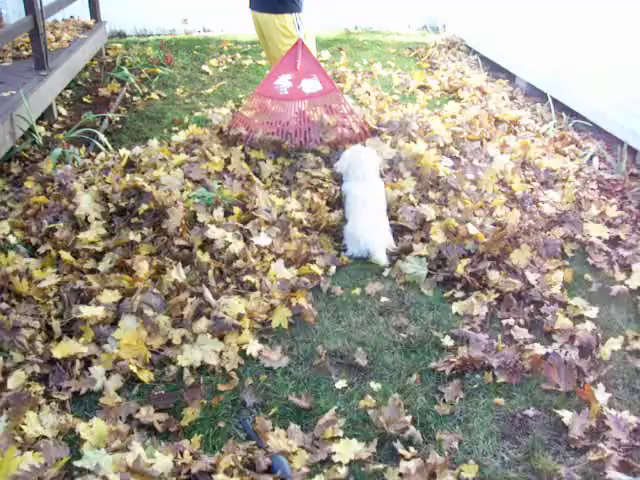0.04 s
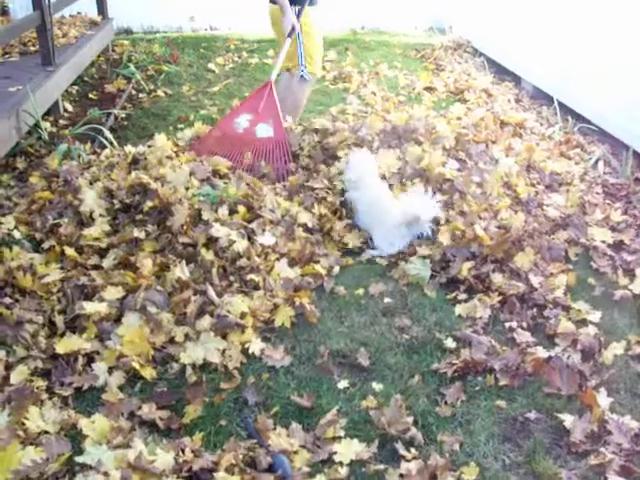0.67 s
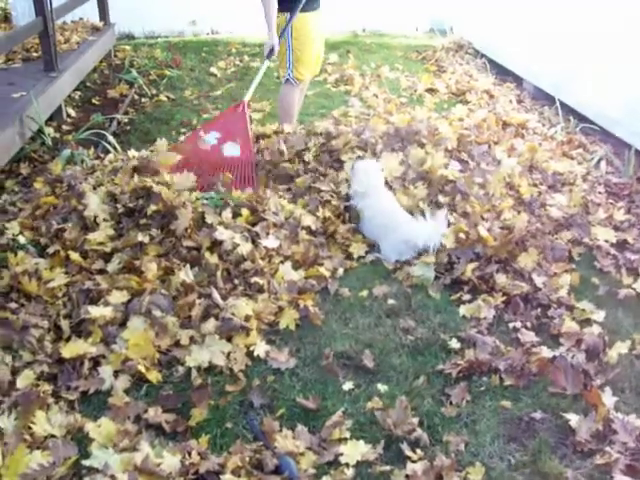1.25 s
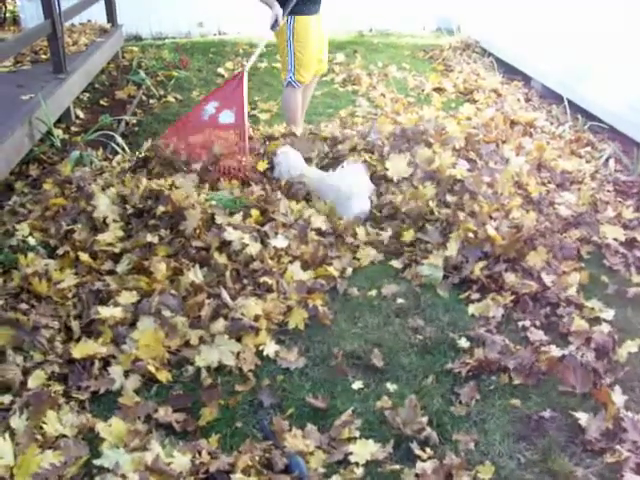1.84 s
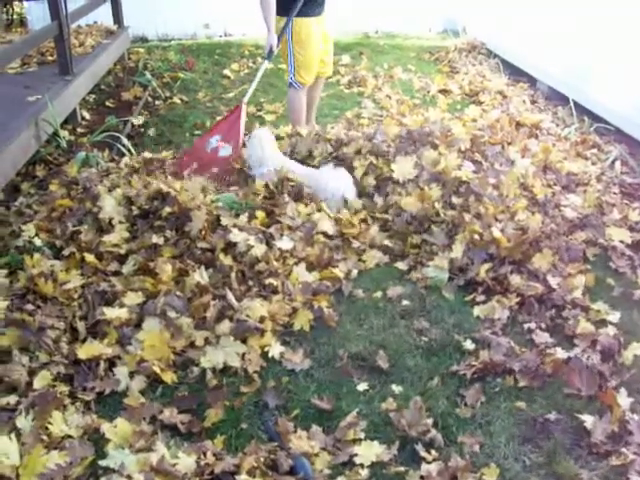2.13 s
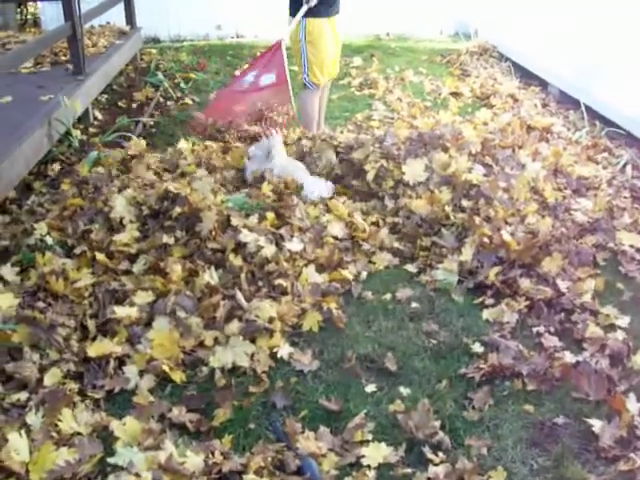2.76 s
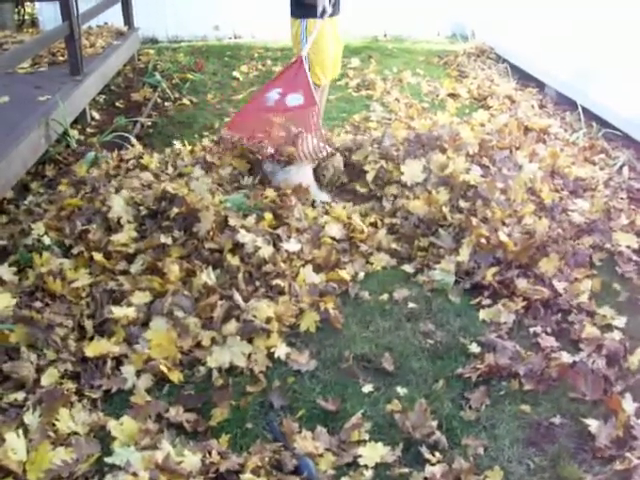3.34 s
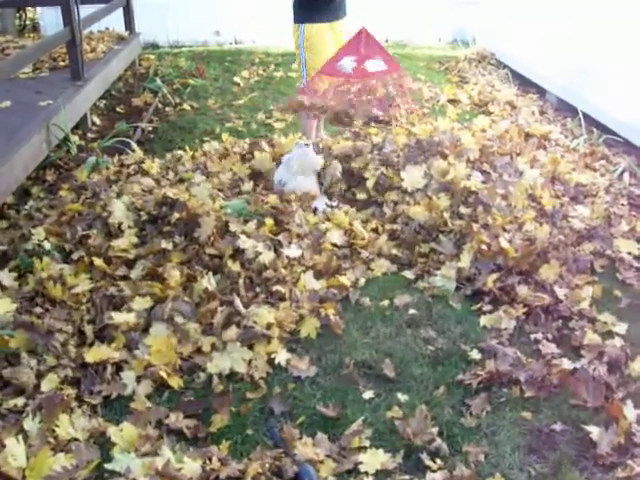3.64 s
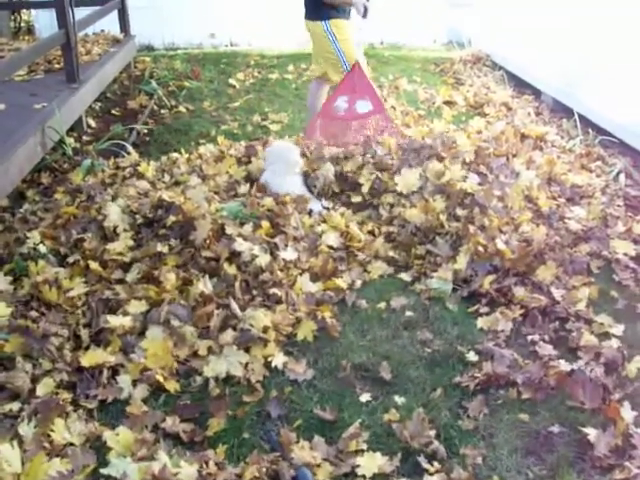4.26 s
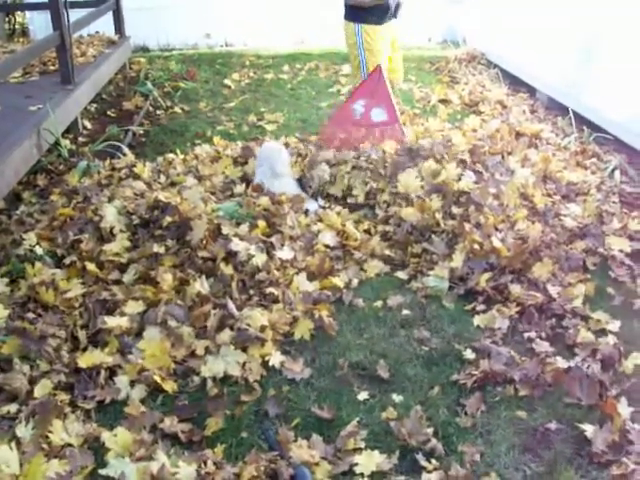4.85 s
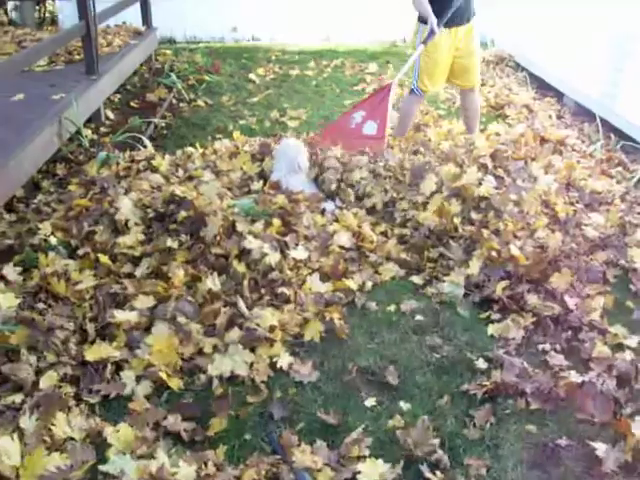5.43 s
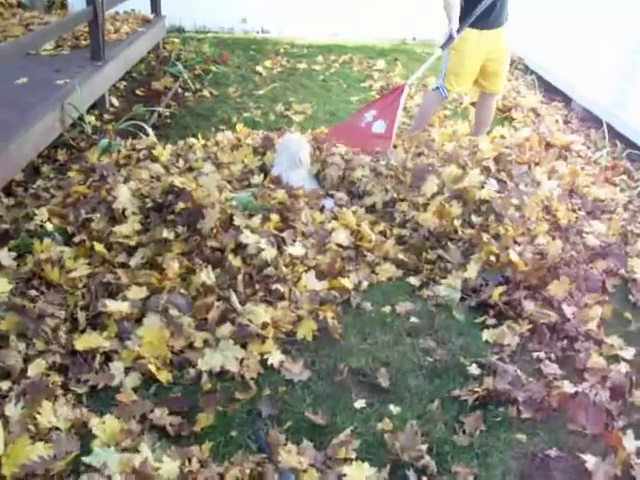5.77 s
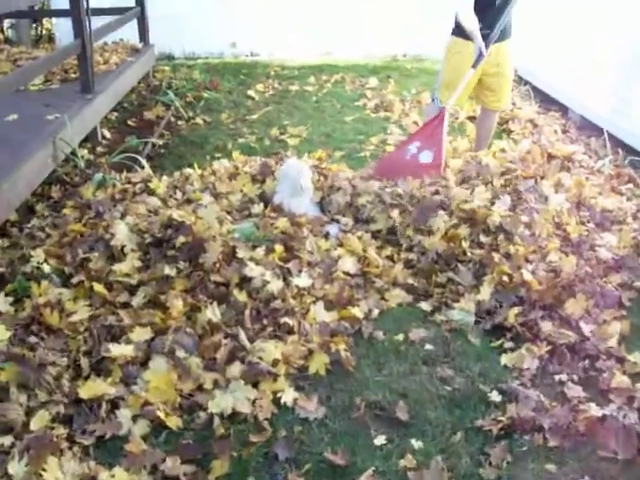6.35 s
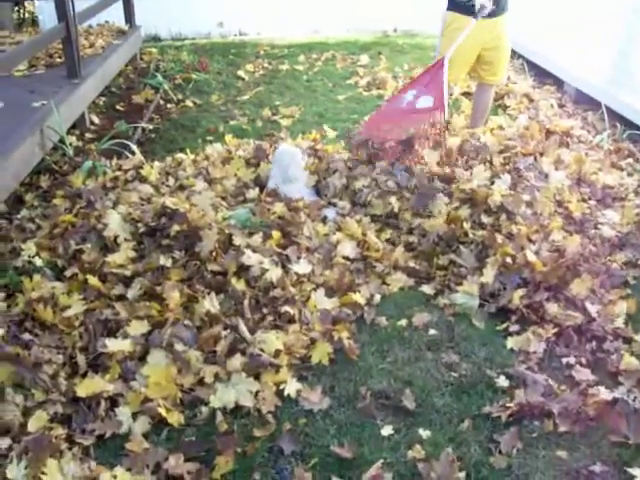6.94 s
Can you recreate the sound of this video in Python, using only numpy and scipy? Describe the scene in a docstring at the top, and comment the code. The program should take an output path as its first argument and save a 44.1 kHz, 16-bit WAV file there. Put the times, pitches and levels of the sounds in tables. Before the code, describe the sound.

A plastic rake is pulled through dry leaves on a lawn a few metres from the microphone, each stroke a crisp rustle with crunching and scraping. A hollow plastic knock comes early, then stalks crack and soft thuds land on the turf. Late on, a close rub comes with a clatter of sharp knocks, followed by more knocks and a second rub. Distant motors hum and air rumbles lightly throughout.

```python
"""A plastic fan rake is dragged through dry leaves on a lawn, a few metres from a small camera.
Far motors hum and air rumbles on the microphone throughout. Each pull sets off a rush of tiny leaf
snaps over the duller crush of the pile and the scrape of the tines (the rake's teeth). Early on, plastic
knocks and a faint tone slides down; then stalks crack, and feet and rake thud on the turf.
Near the end come a close rub with a clatter of sharp knocks, a few more knocks and a second rub."""
import sys
import numpy as np
from scipy import signal
from scipy.fft import rfft, irfft
from scipy.io import wavfile
from scipy.ndimage import uniform_filter1d

SR = 44100
rng = np.random.default_rng(int(sys.argv[2]) if len(sys.argv) > 2 else 0)


def inscribe(sig):
    """Save sig as 16-bit PCM at rate SR to the path in sys.argv[1].

    A 1-D sig is mono; a 2-D sig holds one channel per row.
    Samples are clipped to [-1, 1] before scaling.
    """
    pcm = np.round(np.clip(np.atleast_2d(sig).T, -1, 1) * 32767)
    wavfile.write(sys.argv[1], SR, pcm.astype(np.int16))


N = 317520
TIME = np.arange(N) / SR

# the tone colour of a dry leaf's crisp snap: f/Hz, level/dB
LEAF_SNAP = [(900, -32.5), (1600, -15.5), (2100, -4), (2500, 0), (3000, -0.5), (3700, -1), (4600, -1.5),
             (6000, -3.5), (7300, -4.5), (9000, -6)]


def undb(db):
    """Turn decibels into a number to multiply by."""
    return 10 ** (np.asarray(db) / 20)


def unit(x):
    """Scale a sound so that its average power is 1."""
    return x / np.sqrt(np.mean(x ** 2))


def fade(t, t60):
    """A fade that loses 60 dB every t60 seconds."""
    return np.exp(-np.log(1000) * t / t60)


def curve(rows):
    """Join (time, value) points with straight lines."""
    return np.interp(TIME, *np.transpose(rows))


def colour(x, points):
    """Make low and high pitches louder or softer, following (f/Hz, level/dB) points."""
    hz, db = np.transpose(points)
    size = 4096
    grid_hz = np.maximum(np.fft.rfftfreq(size, 1 / SR), 1)
    gains = undb(np.interp(np.log(grid_hz), np.log(hz), db))
    # build the filter so that it rings only after a sound, never before it
    cepstrum = irfft(np.log(gains))
    cepstrum[1:size // 2] *= 2
    cepstrum[size // 2 + 1:] = 0
    return signal.fftconvolve(x, irfft(np.exp(rfft(cepstrum))))[:len(x)]


def band(x, lo_hz, hi_hz):
    """Keep mostly the pitches between two limits."""
    return signal.sosfilt(signal.butter(2, [lo_hz, hi_hz], "band", fs=SR, output="sos"), x)


def walk(rate):
    """A smooth random wobble, about 1 in size, that heads for a new value rate times a second."""
    hold = max(int(SR / rate), 1)
    steps = np.repeat(rng.standard_normal(N // hold + 1), hold)
    return unit(uniform_filter1d(uniform_filter1d(steps, hold), hold)[:N])


def grains(per_s, spread_db):
    """Random tiny ticks of uneven size, with steady average power."""
    chance = np.clip(per_s / SR, 0, 1)
    size = undb(spread_db * np.minimum(rng.exponential(size=N), 5))
    ticks = (rng.random(N) < chance) * rng.choice([-1, 1], N)
    return unit(ticks * size / np.sqrt(chance))


def burst(rise_s, t60):
    """Noise that swells and dies away."""
    t = TIME[:SR // 4]
    shape = (1 - np.exp(-t / rise_s)) * fade(t, t60)
    return rng.standard_normal(len(t)) * shape / shape.max()


def ring(modes, alternate):
    """The dying tones of a struck object; flipping every other one spreads out the start."""
    t = TIME[:SR // 4]
    sign = -1 if alternate else 1
    tones = sum(sign ** k * undb(db) * np.sin(2 * np.pi * hz * t) * fade(t, t60)
                for k, (hz, db, t60) in enumerate(modes))
    return tones / np.abs(tones).max()


def gesture(start, rise, hold, t60):
    """The power of one movement: it speeds up evenly, holds, and dies away."""
    ramp = np.clip((TIME - start) / max(rise, 1 / SR), 0, 1)
    after = np.maximum(TIME - start - rise - hold, 0)
    return (ramp * fade(after, t60)) ** 2


def add(out, s, sound):
    """Mix a sound in at s seconds."""
    i = int(s * SR)
    out[i:i + len(sound)] += sound[:N - i]


def air():
    """The far neighbourhood murmurs, and small puffs of air rumble on the microphone."""
    # the tone colour of the outdoor background: f/Hz, level/dB
    outdoor_colour = [(20, 2.5), (50, 0.5), (80, -1.5), (110, -9.5), (170, -7), (260, -10), (340, -12.5),
                      (450, -17.5), (620, -22), (900, -19.5), (1500, -27), (4000, -25), (8000, -28)]
    # how that background swells and sinks: t/s, relative level/dB
    outdoor_levels = [(0.4, -39.5), (5.6, -34.5), (6.2, -38), (7.2, -33.5)]
    murmur = unit(colour(rng.standard_normal(N), outdoor_colour))
    murmur_db = curve(outdoor_levels) - 1.0 + 0.73 * walk(6.5)
    puffs = unit(band(rng.standard_normal(N), 6.2, 24) * undb(5.0 * walk(12)))
    return undb(murmur_db) * murmur + undb(-44.5) * puffs


def motors():
    """A far motor and a far engine hum; the air on the way makes each tone waver."""
    # how loud the motor drones: t/s, level/dB
    drone_levels = [(0.4, -49), (0.83, -56), (1.13, -44), (3.2, -36.5), (3.51, -47), (3.78, -37),
                    (4.07, -47), (4.36, -40.5), (7.2, -47)]
    # how the engine swells and sinks: t/s, relative level/dB
    engine_levels = [(0.4, -58), (2.7, -46.5), (4.0, -48), (4.75, -42.5), (5.75, -44), (6.05, -50.5),
                     (7.2, -44.5)]
    # the engine's tones: multiple of its turning rate, relative level/dB
    engine_tones = [(2, -1), (4, -3), (5, 0), (6, 0), (8, -2.5), (9, -3.5), (10, -9), (11, -7.5), (12, -11)]
    turning_hz, drone_hz = 25.29, 216.7

    def tone(hz, wander, waver_db):
        phase = 2 * np.pi * np.cumsum(hz * (1 + wander * walk(6))) / SR
        return unit(np.sin(phase) * undb(waver_db * walk(9)))
    engine = sum(undb(db) * tone(multiple * turning_hz, wander=0.00588, waver_db=2.2)
                 for multiple, db in engine_tones)
    drone = tone(drone_hz, wander=0.0034, waver_db=0.3)
    return undb(curve(drone_levels)) * drone + undb(curve(engine_levels) - 2.5) * engine


def raking():
    """How strong rustle, crush and scrape are: each pull bites, holds, coasts and lets leaves settle."""
    # pulls of the rake: start/s, rise/s, hold/s, rustle level/dB, crush/dB, scrape/dB
    # (crush and scrape are counted from the rustle level)
    pulls = [(0.342, 0.01, 0.028, -30, -5, -11), (0.453, 0.073, 0.17, -35.0, -7.5, -11.5),
             (0.992, 0.057, 0.064, -31.0, -8.0, -12), (1.233, 0.063, 0.01, -24.0, -6.5, -14),
             (1.437, 0.064, 0.094, -39.5, -9.5, -14), (1.574, 0.062, 0.182, -34.0, -6.5, -12.5),
             (1.719, 0.089, 0.204, -29.0, -6, -10.5), (2.049, 0.04, 0.084, -25.5, -6.0, -9.0),
             (2.252, 0.034, 0.104, -29.5, -6, -10.5), (2.453, 0.051, 0.31, -35.0, -5.5, -9),
             (2.981, 0.087, 0.03, -38.5, -2.0, -9), (3.132, 0.136, 0.13, -31.5, -6.5, -8.5),
             (3.426, 0.056, 0.052, -37.5, -3.5, -17), (3.731, 0.065, 0.066, -44.5, -6.0, -14),
             (3.909, 0.07, 0.12, -27, -6.0, -7), (4.197, 0.072, 0.036, -30.5, -6.0, -7),
             (4.324, 0.087, 0.018, -25.0, -6, -7), (4.453, 0.045, 0.025, -30.5, -5.5, -10),
             (4.54, 0.059, 0.122, -29.5, -4.0, -5.5), (4.802, 0.05, 0.177, -31.0, -6.5, -9.5),
             (4.961, 0.21, 0.031, -24.0, -7.5, -8.5), (5.219, 0.034, 0.19, -32.0, -3.5, -7.5),
             (5.858, 0.075, 0.054, -24, -5, -8), (6.087, 0.031, 0.03, -34.5, -6.5, -17),
             (6.59, 0.056, 0.068, -28.5, -6.5, -9.5), (6.774, 0.075, 0.113, -36, -12, -16),
             (6.9, 0.16, 0.086, -25.0, -9.5, -12)]
    bite_db, bite_s = 1.74, .042
    settle_db, stir_db = -11.5, -56
    power = np.zeros((3, N))
    for start, rise, hold, db, crush_db, scrape_db in pulls:
        bite = undb(bite_db * np.exp(-np.abs(TIME - start - rise) / bite_s))  # entering the pile
        pull = gesture(start, rise, hold, t60=.51 + 3.6 * hold) * bite ** 2  # long pulls coast longer
        settle = gesture(start, rise, hold, t60=1.98) * undb(settle_db) ** 2
        power += np.outer(undb([db, db + crush_db, db + scrape_db]) ** 2, pull + settle)
    power[0] += undb(stir_db) ** 2  # leaves stir even between pulls
    return np.sqrt(power)


def leaves():
    """The faster the rake moves, the more leaves snap; they catch and let go in small clusters."""
    # the tone colour of the pile being crushed: f/Hz, level/dB
    crush_colour = [(120, -9.5), (250, -5), (400, -2.5), (590, -10.5), (740, -0.5), (880, 2), (1180, -1.5),
                    (1600, 1), (2100, -2), (3000, -9), (6000, -19.5)]
    # the tone colour of the scraping plastic tines: f/Hz, level/dB
    scrape_colour = [(1500, -31), (2150, -8), (2450, -1.5), (2700, -3), (3050, -5.5), (3370, -5.5),
                     (4000, -8.5), (7000, -25.5)]
    rustle_gain, crush_gain, scrape_gain = raking()
    snaps_per_s = 6500 * (rustle_gain / undb(-28)) ** .8
    clusters = undb(0.47 * walk(45) + 0.34 * walk(250))
    snaps = unit(colour(grains(snaps_per_s, spread_db=-0.5), LEAF_SNAP))
    # thin dry edges make the highest sounds; their share falls as the tines dig deeper
    edges = signal.sosfiltfilt(signal.butter(2, 4600, "high", fs=SR, output="sos"), snaps)
    dig_db = np.maximum(20 * np.log10(scrape_gain / rustle_gain + 1e-9) + 10, -6)
    rustle = undb(1.48) * (snaps - edges) + undb(4 - 0.42 * dig_db) * edges
    crush = unit(colour(grains(1.2 * snaps_per_s, spread_db=1.5), crush_colour))
    # tines pressed to the ground catch and flick free
    scrape = unit(colour(grains(.3 * snaps_per_s, spread_db=2.5), scrape_colour))
    crush *= undb(0.77 * walk(60))
    return clusters * (rustle_gain * rustle + crush_gain * crush + scrape_gain * scrape)


def sliding_tone():
    """A short soft tone flutters as it slides down and fades."""
    start_s, start_hz, fall_hz_per_s, flutter_hz = .512, 406, 650, 26.2
    out, t = np.zeros(N), TIME[:SR // 8]
    tone = np.sin(2 * np.pi * np.cumsum(start_hz - fall_hz_per_s * t) / SR)
    flutter = np.sin(np.pi * flutter_hz * t) ** 2
    shape = fade(t, t60=0.61) * signal.windows.tukey(len(t))
    add(out, start_s, undb(-30.5) * shape * flutter * tone)
    return out


def knocks():
    """Hard hits on plastic click brightly, softer ones mostly ring its hollow body; both crack briefly."""
    # knocks on plastic: t/s, click level/dB, body level/dB, hardness as treble boost/(dB per octave)
    hits = [(0.522, -34, -15.5, -2), (0.764, -40, -30.5, 0), (5.8427, -17, -26, 10), (5.844, -3.5, -19, 8),
            (5.8455, -14, -19, 0), (5.8515, -23, -13, -3), (5.8607, -17, -18, -4), (5.869, -25, -19, 9),
            (5.902, -22, -15, 1), (5.938, -20, -18, -7), (6.002, -20, -22, -8), (6.4229, -21, -33, -2),
            (6.4288, -9, -10.5, -1), (6.463, -28, -25.5, 2), (6.487, -30, -29, -2)]
    # the tones of the bright click: f/Hz, relative level/dB, time to fade by 60 dB/s
    click_tones = [(1780, -22, 0.012), (2580, -6, 0.011), (3630, -2, 0.014), (3900, -3.5, 0.015),
                   (4430, -8, .01), (5200, -11.5, 0.015), (5760, -6, 0.0089), (6380, -4.5, .007),
                   (7140, -4.5, 0.0036)]
    # the tones of the hollow body: f/Hz, relative level/dB, time to fade by 60 dB/s
    body_tones = [(312, -17.5, 0.0051), (507, -14, 0.01), (794, -4.5, 0.019), (940, 5.5, 0.025),
                  (1130, 0, .016), (1420, 1, .012)]
    out = np.zeros(N)
    for s, click_db, body_db, tilt_db in hits:
        tilted = [(hz, db + tilt_db * np.log2(hz / 1000), t60) for hz, db, t60 in click_tones]
        click = ring(tilted, alternate=True) + 0.17 * burst(rise_s=0.00018, t60=0.03)
        dull_crack = band(burst(rise_s=0.00038, t60=0.02), 400, 1700)
        body = ring(body_tones, alternate=False) + 0.48 * dull_crack
        add(out, s, undb(click_db) * click + undb(body_db) * body)
    return out


def cracks():
    """A brittle leaf or stalk gives way in a burst a few thousandths of a second long."""
    # single loud breaks: t/s, relative level/dB
    breaks = [(1.216, -19), (1.255, -16), (1.277, -11), (1.314, -8), (2.2103, -10), (2.659, -21),
              (2.807, -20.5), (3.065, -25), (3.925, -23), (3.952, -12), (3.978, -14), (4.022, -12),
              (7.02, -9)]
    out = np.zeros(N)
    for s, db in breaks:
        add(out, s, undb(db) * burst(rise_s=0.00028, t60=.014))
    return colour(out, LEAF_SNAP)


def thuds():
    """Feet and rake land softly on the turf, muffled by the leaves."""
    # dull blows: t/s, peak level/dB, middle f/Hz
    blows = [(2.6, -31, 380), (3.265, -32, 386), (3.385, -32.5, 385), (4.234, -30, 353), (4.39, -34, 380),
             (4.951, -32, 420), (5.359, -29, 440), (7.041, -24.5, 523), (7.11, -29.5, 494)]
    out = np.zeros(N)
    for s, db, hz in blows:
        blow = band(burst(rise_s=0.0071, t60=0.22), 0.82 * hz, 1.25 * hz)
        add(out, s, undb(db) * blow / np.abs(blow).max())
    return out


def rubs():
    """Surfaces stick and slip, sending uneven ticks through a hollow body."""
    # close rubs: start/s, rise/s, hold/s, level/dB
    strokes = [(5.812, 0.024, 0.16, -29), (7.027, 0.072, .04, -31.5)]
    # the tone colour of the rubbed body: f/Hz, level/dB
    body_colour = [(150, -17.5), (400, -14), (650, -6.5), (900, 0), (1120, 1), (1300, 0), (1550, -2),
                   (2000, -6.5), (4000, -13), (8000, -30)]
    power = sum(undb(db) ** 2 * gesture(start, rise, hold, t60=0.28)
                for start, rise, hold, db in strokes)
    slips = grains(1400, spread_db=2.1) * undb(1.5 * walk(110))
    return unit(colour(slips, body_colour)) * np.sqrt(power)


def rising_zip():
    """A thin zip opens the first rub, rising in pitch as the contact speeds up."""
    start_s, length_s, start_hz, rise_hz_per_s = 5.814, .018, 4300, 110000
    age = np.clip(TIME - start_s, 0, length_s)
    tone = np.sin(2 * np.pi * np.cumsum(start_hz + rise_hz_per_s * age) / SR)
    swell = np.sin(np.pi * age / length_s) ** 2
    return undb(-35) * swell * unit(walk(1500) * tone)


def scene():
    """All the sounds meet at one microphone."""
    yard_work = leaves() + cracks() + thuds() + sliding_tone() + rubs() + rising_zip() + knocks()
    return (yard_work + motors() + air())[None]


def record(dry):
    """The camera's sound switches on a moment late, rounds the loudest peaks and cuts the top treble."""
    switch_on_s, peak_limit, top_hz = .372, .7, 7950
    opened = dry * (TIME >= switch_on_s)
    rounded = peak_limit * np.tanh(opened / peak_limit)
    lowpass = signal.firwin(61, top_hz, window=("kaiser", 4.5), fs=SR)
    return signal.fftconvolve(rounded, lowpass[None], mode="same")


dry = scene()
out = record(dry)
inscribe(out)
```